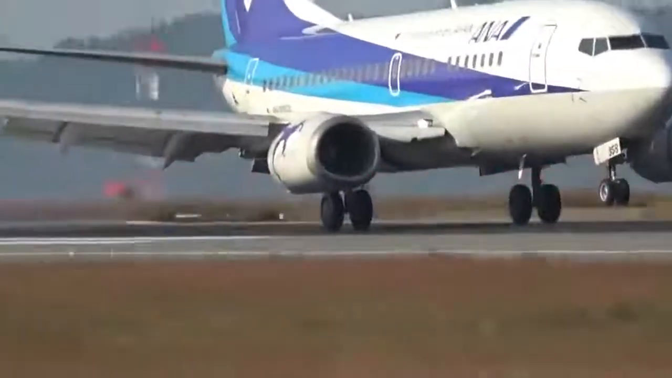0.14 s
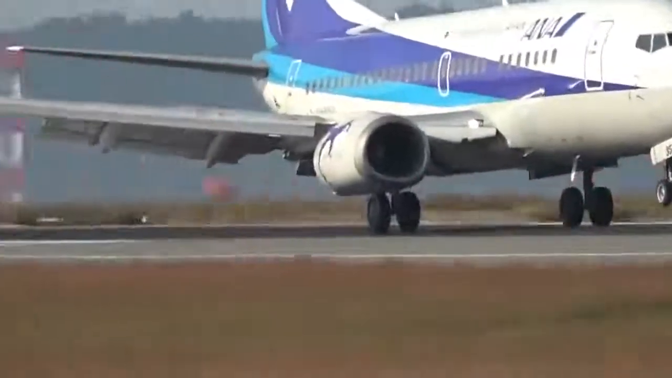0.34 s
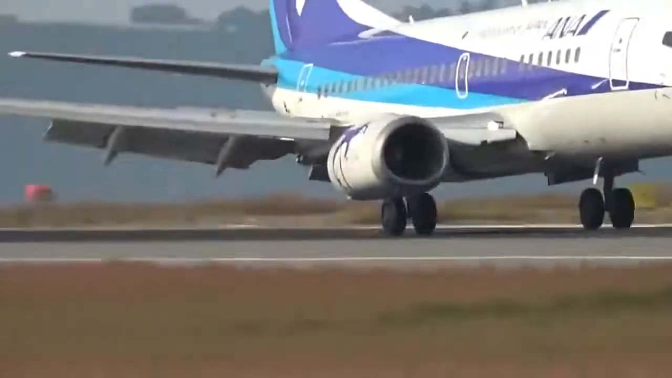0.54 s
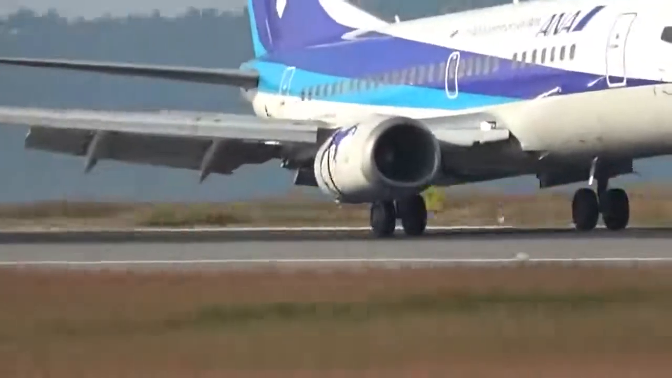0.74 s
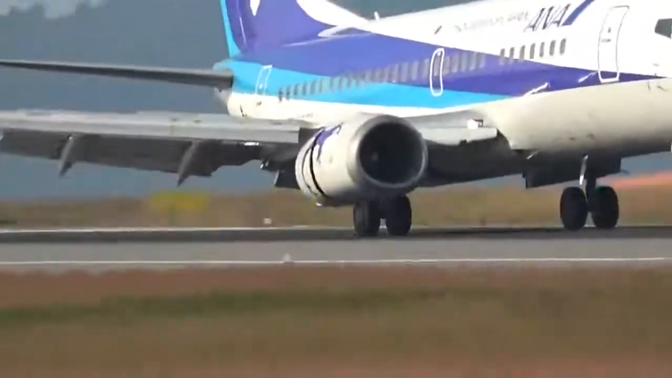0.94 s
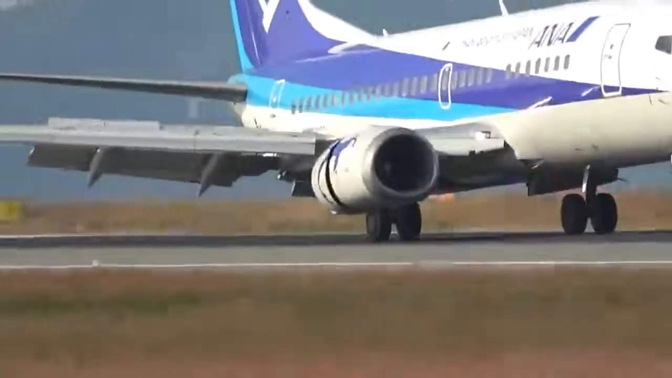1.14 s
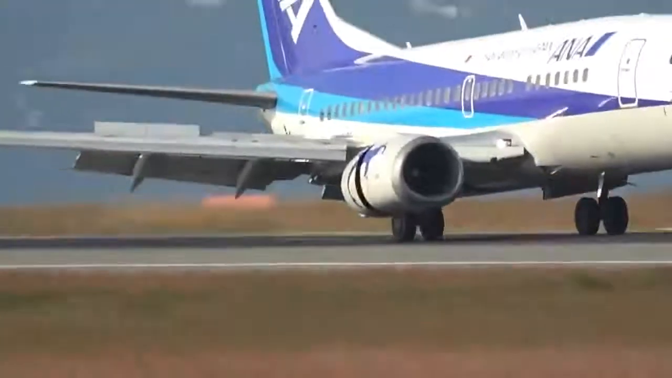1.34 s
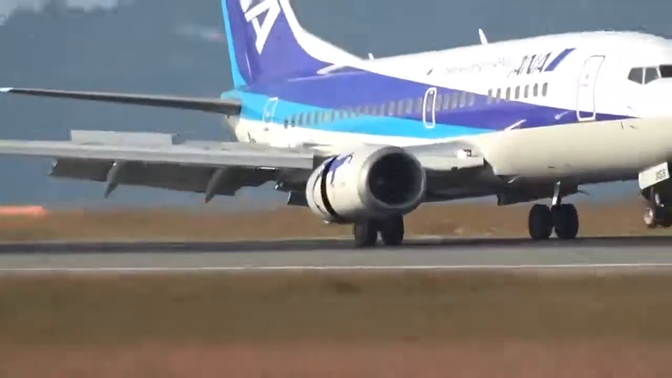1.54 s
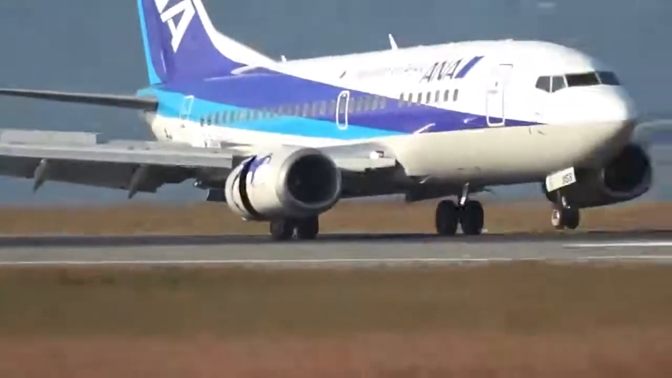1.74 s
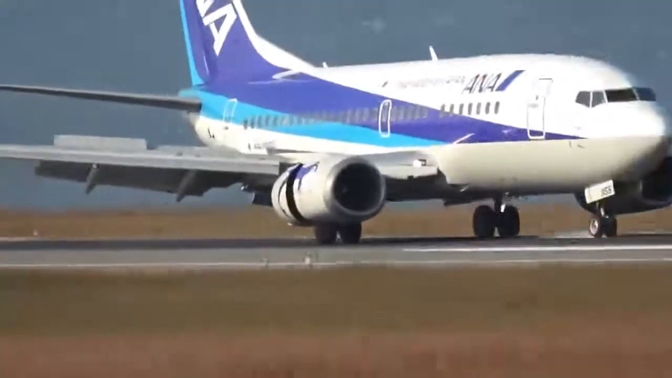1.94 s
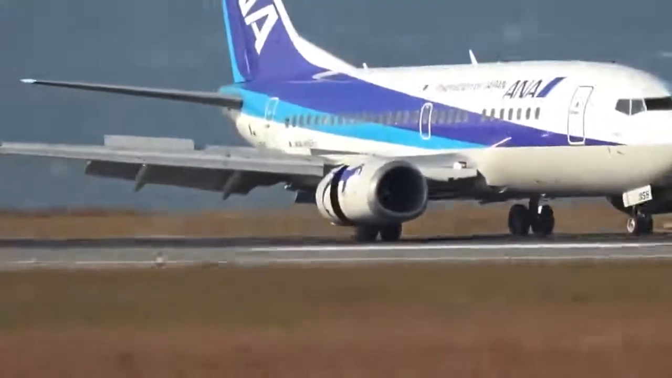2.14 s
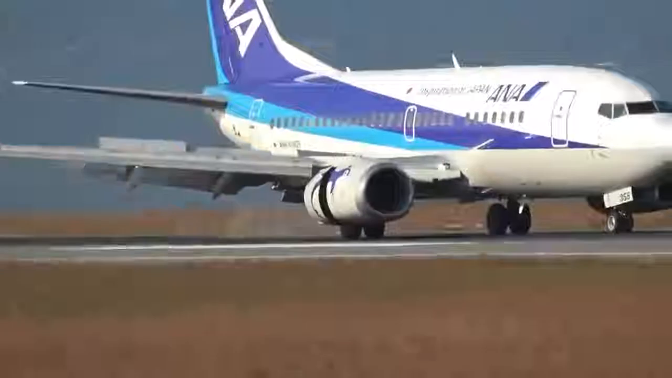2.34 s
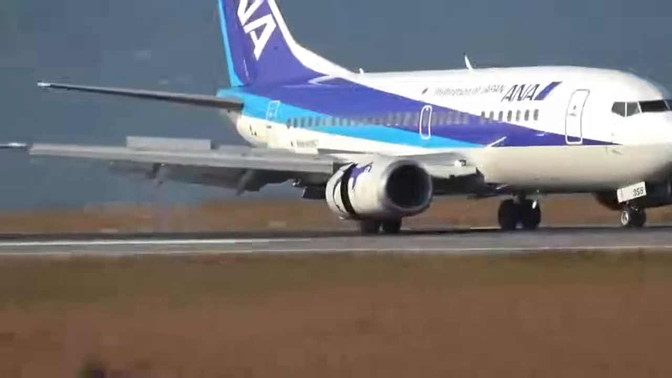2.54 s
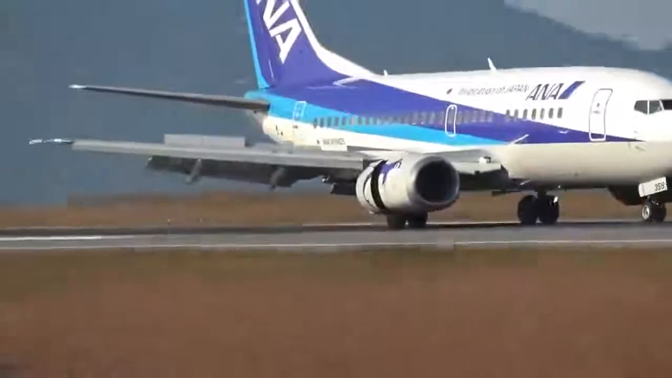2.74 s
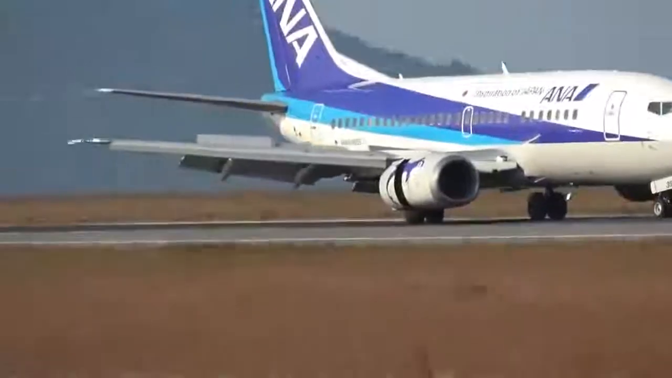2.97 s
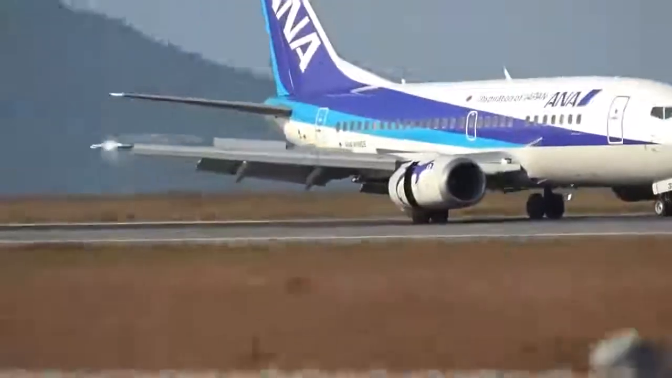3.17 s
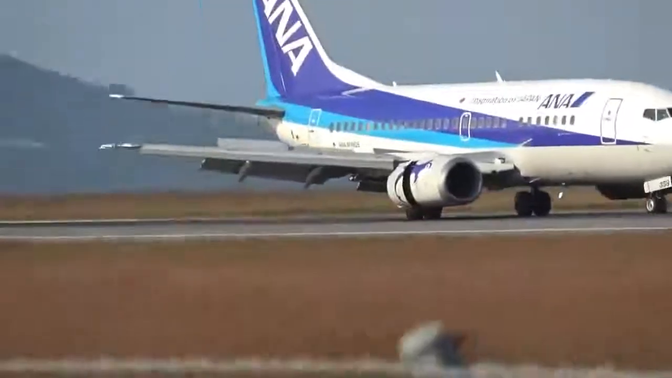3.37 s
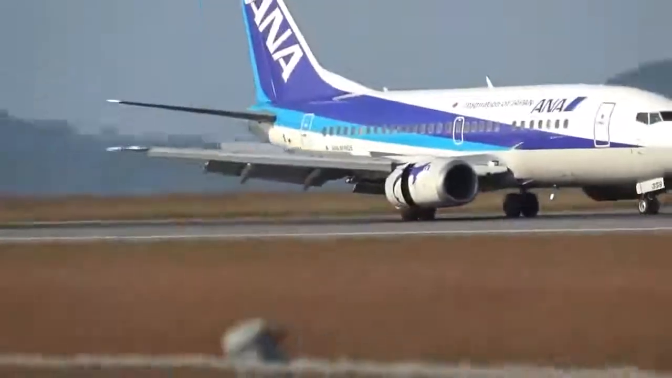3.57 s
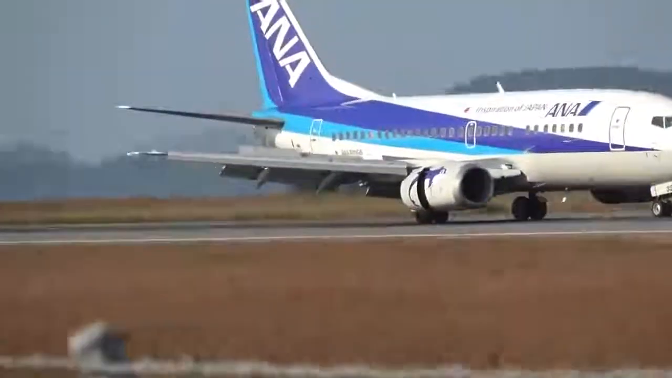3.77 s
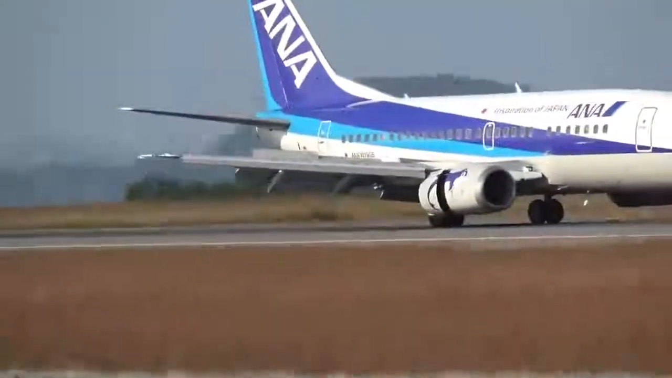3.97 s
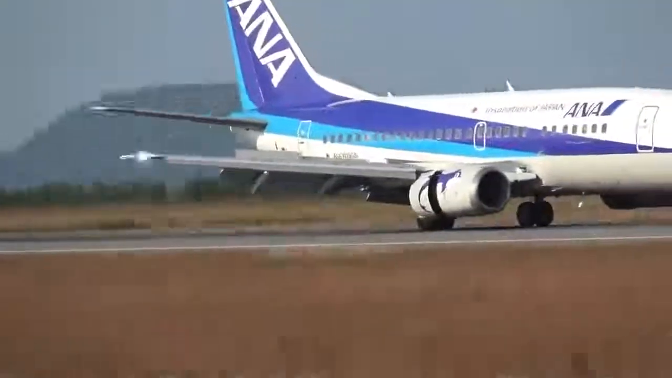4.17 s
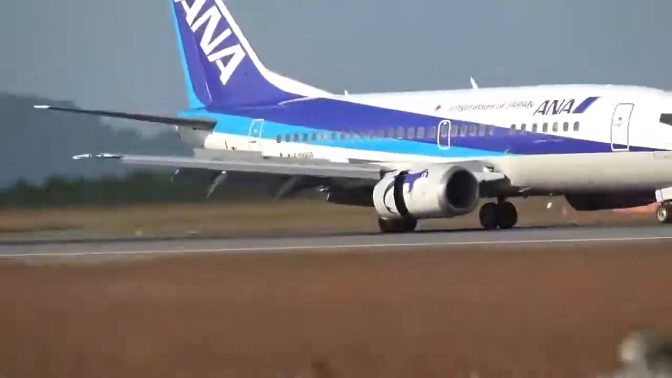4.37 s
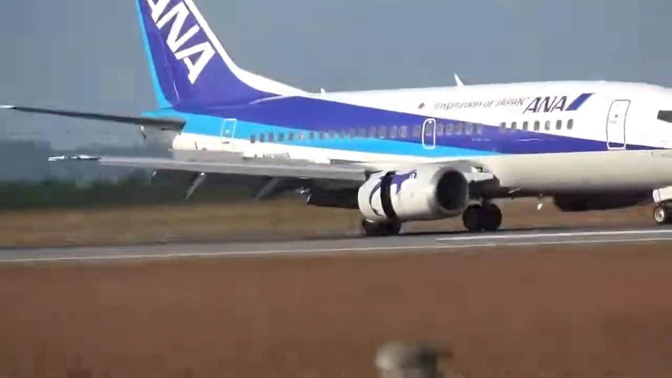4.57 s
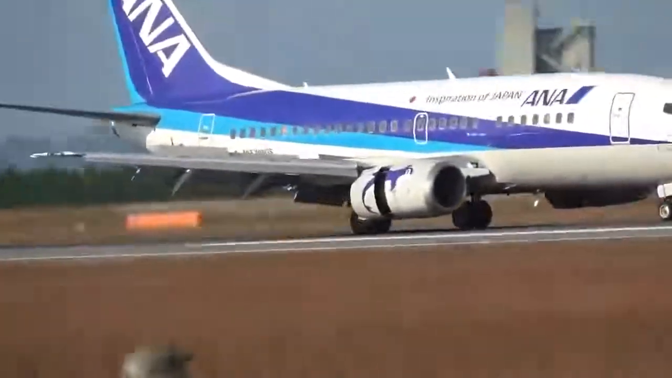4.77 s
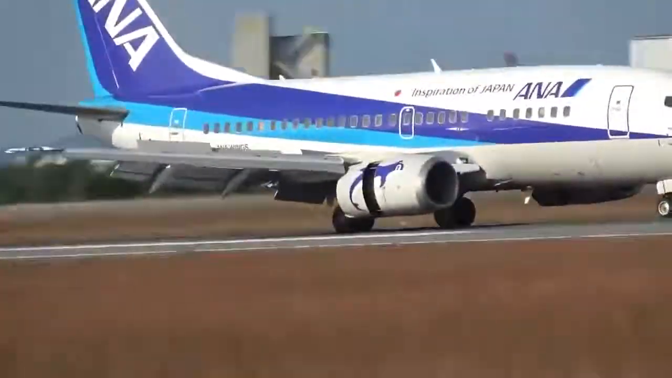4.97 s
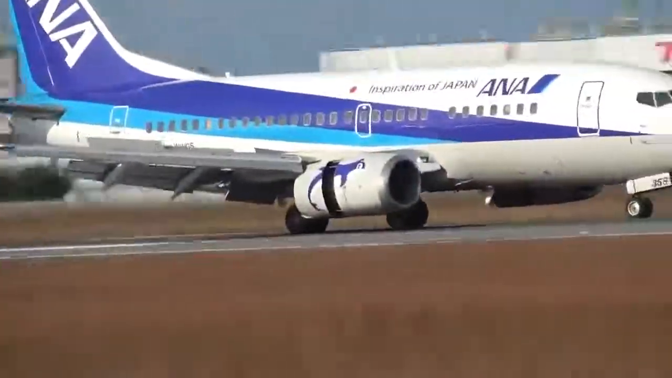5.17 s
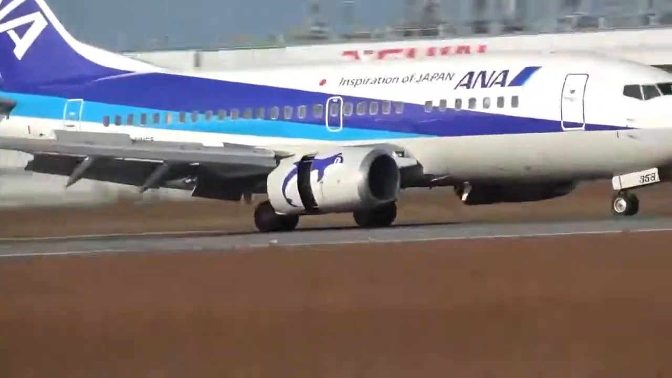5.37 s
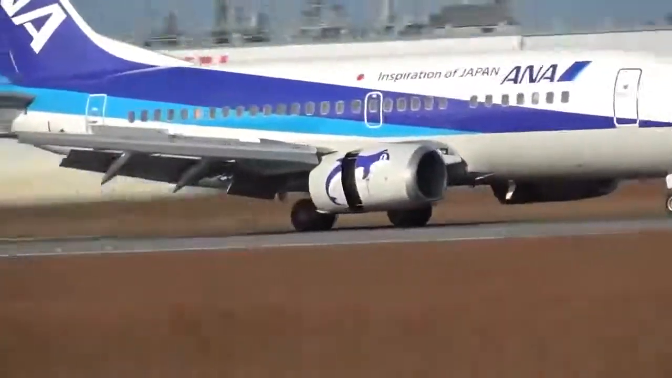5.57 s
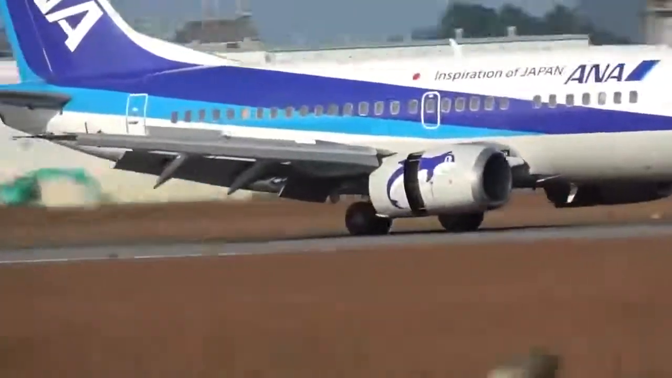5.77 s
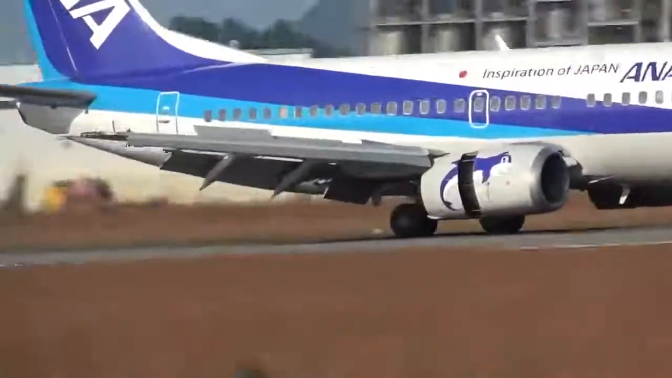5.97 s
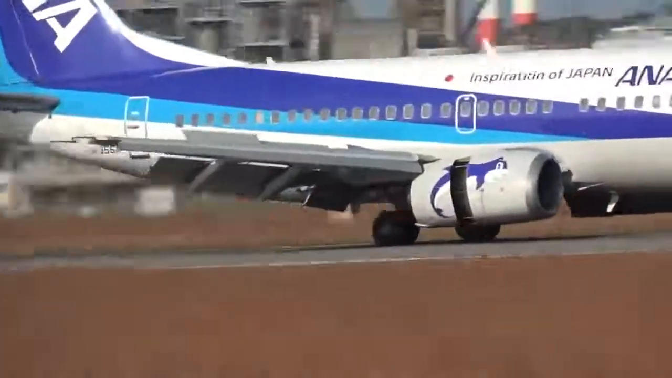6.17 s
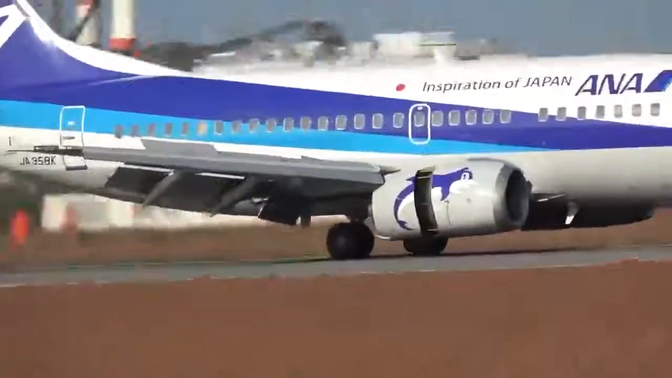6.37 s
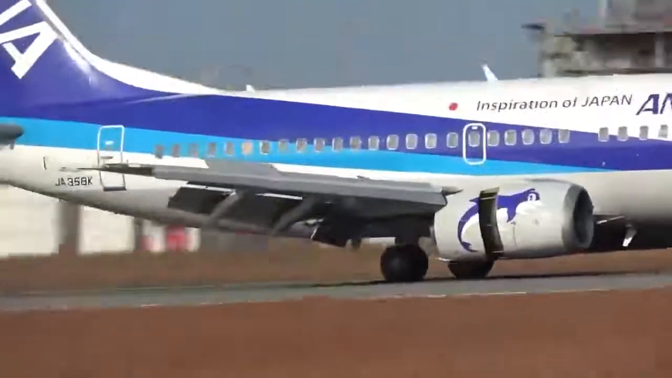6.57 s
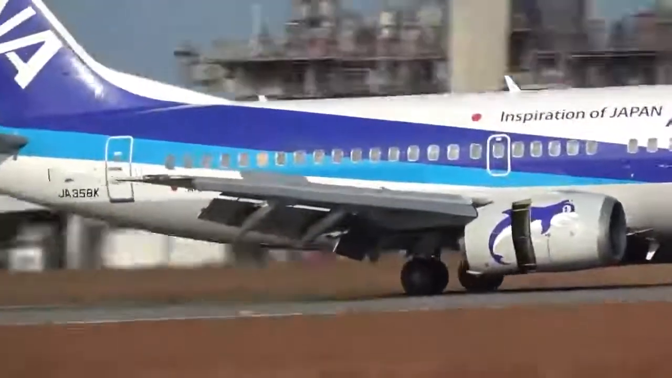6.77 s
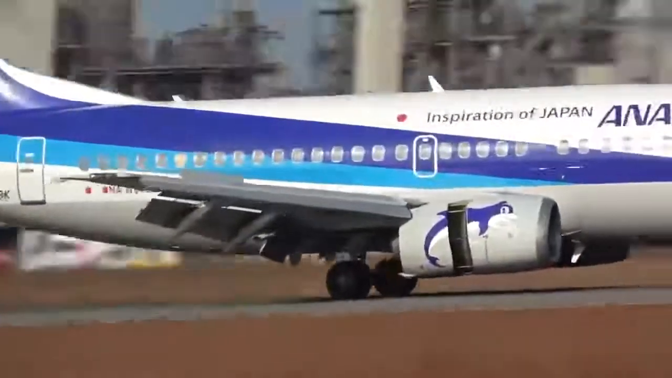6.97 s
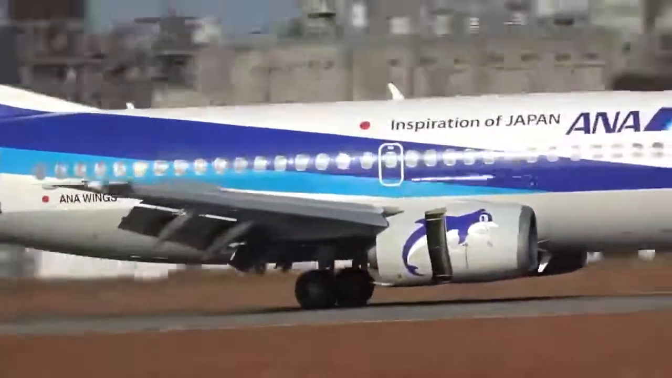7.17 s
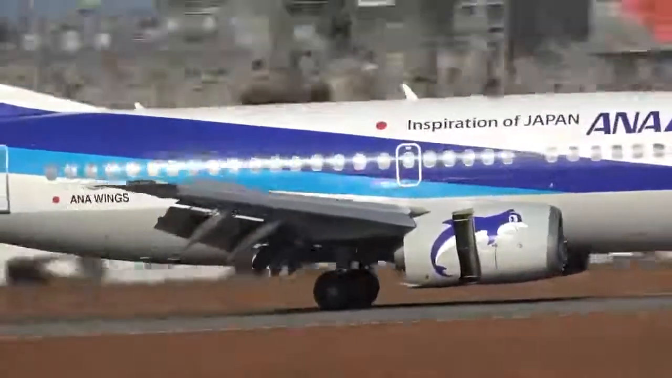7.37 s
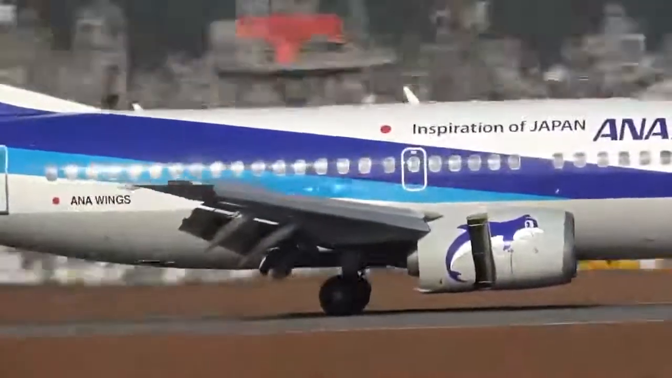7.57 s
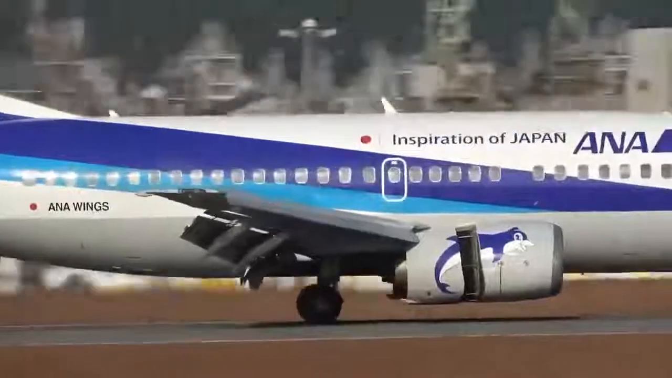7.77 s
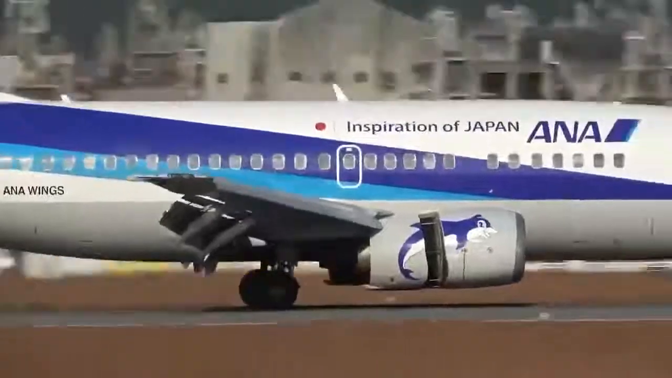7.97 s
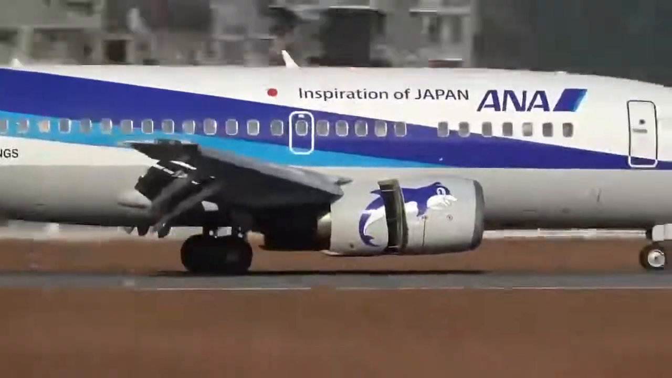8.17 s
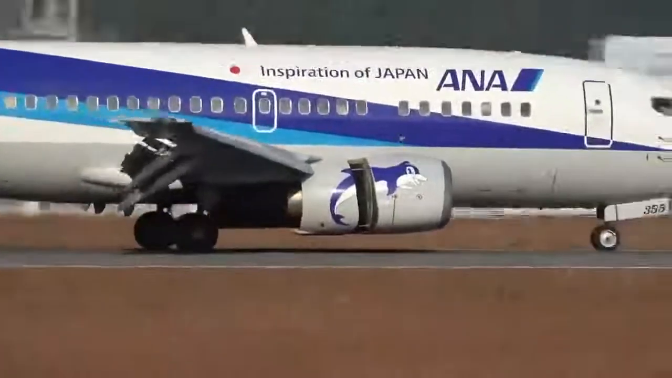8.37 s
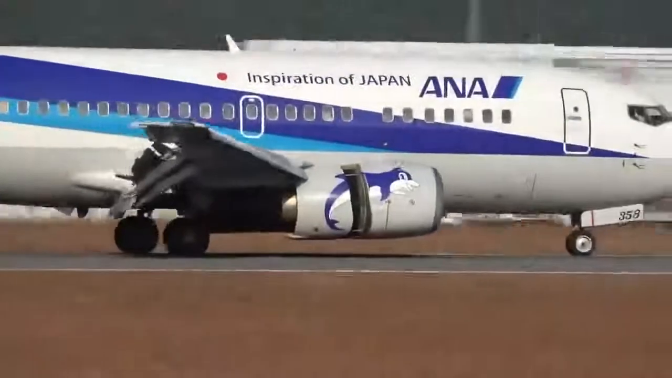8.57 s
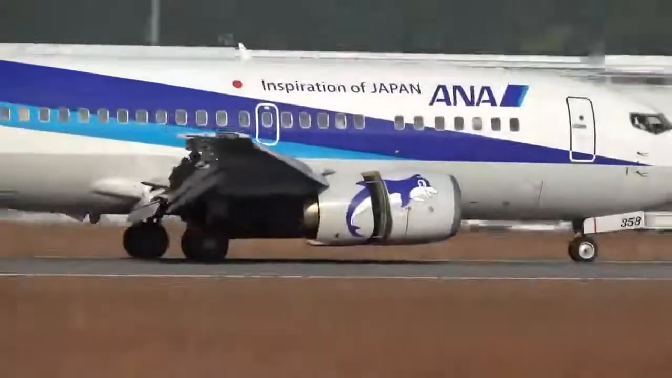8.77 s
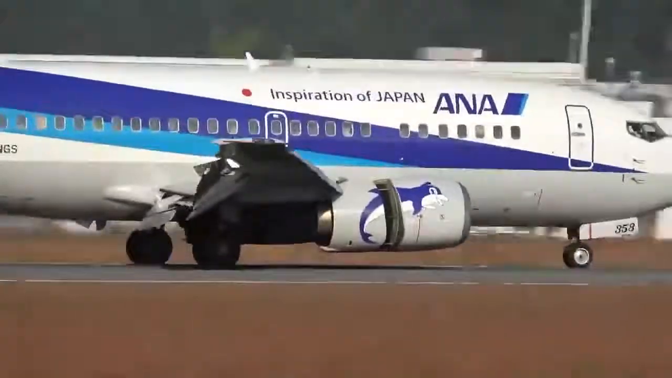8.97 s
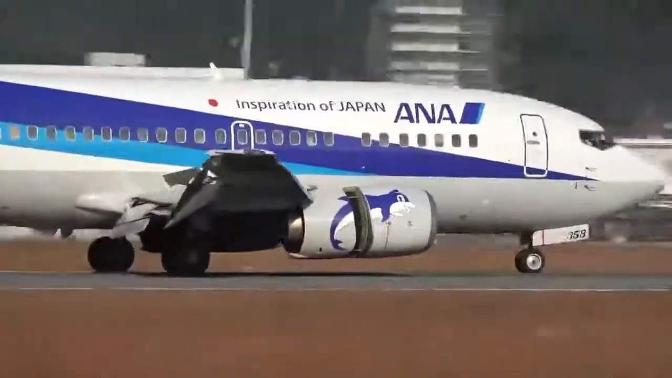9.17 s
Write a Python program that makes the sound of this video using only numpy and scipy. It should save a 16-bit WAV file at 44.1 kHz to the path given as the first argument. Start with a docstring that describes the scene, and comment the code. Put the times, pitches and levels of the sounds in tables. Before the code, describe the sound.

Distant jet engines hum in a light breeze, then build to a loud rushing roar as the landing airliner brakes and draws near.

```python
"""Beside a runway, far from a landing twin-jet airliner. A breeze bumps the microphone over the wash
of the open field, a low exhaust rumble and the hum of idling engines. From about 2 s the thrust
reversers open: the rumble builds, and the reversed fan air roars and hisses, brighter as it nears.
Around 4-5 s a whine sinks through it while compressor whistles climb. Moving air keeps carrying
the hiss over in short swells, and the roar holds until a short fade at the end."""
import sys
import numpy as np
from scipy import signal
from scipy.fft import rfft, irfft, next_fast_len
from scipy.io import wavfile
from scipy.ndimage import uniform_filter1d, minimum_filter1d, map_coordinates

SR = 44100
rng = np.random.default_rng(int(sys.argv[2]) if len(sys.argv) > 2 else 0)


def log_audio(samples):
    """Write samples as a 16-bit WAV file to the path given in sys.argv[1]."""
    # one column per channel
    frames = np.atleast_2d(samples).T
    # limit to full scale, then quantise
    limited = np.clip(frames, -1, 1)
    pcm = np.round(limited * 32767).astype(np.int16)
    wavfile.write(sys.argv[1], SR, pcm)


N = 406602
TIME = np.arange(N) / SR

# level of the reversers' roar and rush, with a short fade-out at the end: t/s, roar/dB, rush/dB
REVERSER_LEVELS = [(0.0, -45.5, -44.5), (0.43, -47, -44.5), (1.38, -43, -39), (2.02, -32.5, -34.5),
                   (2.87, -38, -36), (3.3, -26.5, -26), (3.64, -25, -24), (3.84, -19, -18),
                   (4.07, -19.5, -20.5), (4.43, -16.5, -21.5), (4.92, -23, -22.5), (5.25, -17.5, -17),
                   (6.07, -12.5, -18.5), (6.74, -15, -18), (7.25, -14.5, -19.5), (8.99, -14, -20.5),
                   (9.1, -13, -22), (9.2, -19.5, -23.5)]
# stereo width of the aircraft at the microphone: f/Hz, side minus mid/dB
AIRCRAFT_WIDTH = [(60, -19.5), (120, -24), (300, -30), (650, -36), (1300, -21), (2000, -22.5), (3700, -19),
                  (4600, -11), (6000, -22.5), (7500, -16.5), (8800, -6), (10500, -26.5)]


def amp(db):
    """Decibels to gain."""
    return 10 ** (np.asarray(db) / 20)


def unit(x):
    """Scale to rms 1."""
    return x / np.sqrt(np.mean(x ** 2) + 1e-20)


def along(points, hz):
    """(f/Hz, value) points read on a log axis."""
    freqs, values = np.transpose(points)
    return np.interp(np.log(hz + 1), np.log(freqs + 1), values)


def curves(rows, t=TIME):
    """Each column after the time, read at times t."""
    times, *columns = np.transpose(rows)
    return [np.interp(t, times, column) for column in columns]


def wobble(rate):
    """A smooth random curve, rate knots a second."""
    return map_coordinates(rng.standard_normal(int(N * rate / SR) + 4), [TIME * rate])


def bell(hz, centre, octaves):
    """A hump of height 1 on a log-frequency axis."""
    return np.exp(-.5 * (np.log2((hz + 1) / centre) / octaves) ** 2)


def hump(s, half_s):
    """A smooth rise and fall of height 1 around time s."""
    return np.exp(-.5 * ((TIME - s) / half_s) ** 2)


def lift(rows):
    """Sum of (t/s, lift/dB, half-length/s) humps, in dB."""
    return sum(db * hump(s, half_s) for s, db, half_s in rows)


def turbulence(colour, width, patchy_db, size=1024):
    """Stereo noise of steady rms 1, its spectrum shaped by colour(hz, t) in dB, with drifting patches."""
    frames = dict(nperseg=size, noverlap=size * 3 // 4)
    hz, t, spectra = signal.stft(rng.standard_normal((2, N)), SR, **frames)
    hz = hz[:, None]
    patches = uniform_filter1d(rng.standard_normal(spectra.shape[1:]), size=7, axis=0)
    patches = unit(uniform_filter1d(patches, size=18, axis=1))
    gain = amp(colour(hz, t) + patchy_db * patches)
    spectra = spectra * gain / np.linalg.norm(gain, axis=0)
    spectra[1] *= amp(along(width, hz))
    mid, side = signal.istft(spectra, **frames)[1][:, :N]
    return unit(np.array([mid + side, mid - side]))


def airfield(level_db=-47, hiss_db=-62):
    """The wide, faint wash of the open field, and the microphone's own hiss."""
    # spectrum of the open field: f/Hz, relative level/dB
    spectrum = [(30, -4.5), (150, -16.5), (260, -8), (800, -7.5), (1500, -23), (2500, -20.5), (5000, -41),
                (8000, -64)]
    wash = turbulence(lambda hz, t: along(spectrum, hz), width=[(30, -5.0)], patchy_db=1.5)
    return amp(level_db) * wash + amp(hiss_db) * rng.standard_normal((2, N))


def wind(lumps_db=1.7):
    """The breeze buffets the two microphone ports unevenly; each gust is a short low thump."""
    # breeze on the microphone: t/s, level/dB
    breeze = [(0, -38), (1.6, -43.5), (2.6, -38), (3.1, -37), (4.2, -36), (6.5, -42), (9.2, -45)]
    # single gusts: t/s, peak level/dB, strongest f/Hz, half-length/s, left minus right/dB
    gusts = [(.2, -26, 50, 0.027, -1), (0.57, -36, 40, 0.052, -8), (0.77, -29, 32, .03, 7),
             (3.72, -32, 38, .08, -1), (4.09, -21, 34, 0.02, -2)]
    # spectrum of the buffeting: f/Hz, relative level/dB
    spectrum = [(10, -12), (40, 2), (70, -5), (130, -27), (400, -49), (2000, -110)]
    peak_hz = spectrum[1][0]
    width = [(30, -2.5)]  # f/Hz, side minus mid/dB
    buffet = turbulence(lambda hz, t: along(spectrum, hz), width, patchy_db=3, size=4096)
    air = amp(curves(breeze)[0] + lumps_db * wobble(7)) * buffet
    for s, db, gust_hz, half_s, pan_db in gusts:
        eddy = turbulence(lambda hz, t: along(spectrum, hz * peak_hz / gust_hz), width,
                          patchy_db=1, size=4096)
        port_db = db + np.array([[pan_db], [-pan_db]]) / 2
        air += amp(port_db) * hump(s, half_s) * eddy
    return air * amp([[-1.5], [1.5]])  # all of it leans 3 dB to the right


def ground_dip(hz, t, octaves=0.33):
    """Direct sound and its reflection off the ground cancel in one band at the microphone; gain in dB."""
    # dip cut by the reflection: t/s, centre f/Hz, depth/dB
    dip = [(0, 278, 6.5), (1.4, 350, -1), (2.6, 330, 3.5), (3.6, 268, 4), (4.1, 256, 11.5), (5.4, 253, 11),
           (6.4, 299, 4.5), (7.3, 327, 4), (9.2, 335, 7.5)]
    centre, depth_db = curves(dip, t)
    return -depth_db * bell(hz, centre, octaves)


def exhaust(churn_db=.5, surge_half_s=0.072):
    """Large eddies in the exhaust rumble below the ground dip, and surge now and then."""
    # rumble building with the thrust: t/s, level/dB
    levels = [(0, -41), (1.3, -40.5), (2.2, -34), (3.0, -26.5), (3.7, -22.5), (4.7, -25.5), (5.5, -24),
              (7.2, -18.5), (7.9, -21.5), (9.2, -23)]
    # spectrum of the rumble: f/Hz, relative level/dB
    spectrum = [(20, -26), (45, -8.5), (70, -1.5), (110, 4), (155, 2), (195, -4.5), (235, -15.5),
                (320, -12), (500, -65)]
    # drift that shifts this spectrum by its ratio to its own mean: t/s, f/Hz
    drift = [(0, 126), (3.3, 123), (4.2, 116), (7, 107.7), (8.6, 141.6)]
    # surges of the rumble: t/s, lift/dB
    surges = [(3.41, 1.5), (5.0, 3.5), (5.85, 2.5), (6.87, 3.5), (7.46, 4), (8.6, 4)]

    def colour(hz, t):
        centre, = curves(drift, t)
        return along(spectrum, hz * np.mean(centre) / centre) + ground_dip(hz, t)
    surge_db = sum(db * hump(s, surge_half_s) for s, db in surges)
    level_db = curves(levels)[0] + surge_db + churn_db * wobble(8.9)
    return amp(level_db) * turbulence(colour, AIRCRAFT_WIDTH, patchy_db=0, size=4096)


def blade_tone(rows, blur_hz, direct, flicker_db):
    """A blade tone from afar: a direct share of its power, the rest scattered by the turbulent air."""
    hz, db = curves(rows)
    carrier = np.exp(2j * np.pi * np.cumsum(hz) / SR)
    scatter = wobble(blur_hz) + 1j * wobble(blur_hz)
    air_path = np.sqrt(direct) + np.sqrt((1 - direct) / 2) * scatter
    sounding = (TIME >= rows[0][0]) & (TIME <= rows[-1][0])
    gate = uniform_filter1d(sounding.astype(float), size=4096)
    flicker = amp(flicker_db * wobble(12))
    return amp(db) * gate * unit(np.real(carrier * air_path) * flicker)


def blades():
    """The idle hum fades; the whine sinks and flares as the jet brakes; whistles climb with the spools."""
    # hum of the idling engines: t/s, f/Hz, level/dB
    idle_track = [(0, 664, -51.5), (.8, 659, -52), (1.6, 658, -68)]
    # falling engine whine: t/s, f/Hz, level between flares/dB
    whine_track = [(0, 2524, -59), (1.6, 2540, -51), (3.4, 2340, -41), (4.3, 2200, -31.5), (4.6, 2110, -32),
                   (5.6, 1974, -34), (6.1, 1860, -42), (6.7, 1750, -56)]
    # flares of the whine: t/s, lift/dB, half-length/s
    flares = [(2.9, 3, 0.18), (3.87, 9.5, .08), (4.29, 10, .09), (5.6, 4, 0.1)]
    # upper compressor whistle: t/s, f/Hz, level/dB
    high_track = [(3.3, 4330, -62), (3.65, 4460, -55), (4.4, 4950, -56), (4.8, 5320, -53), (5.2, 5800, -67)]
    # lower compressor whistle: t/s, f/Hz, level/dB
    low_track = [(3.4, 2900, -60), (3.8, 3280, -34.5), (4.25, 3960, -57), (4.47, 4180, -34.5),
                 (4.6, 4290, -45), (4.76, 4490, -42), (4.95, 4690, -54), (5.22, 5170, -44),
                 (5.45, 5440, -51)]
    hum = blade_tone(idle_track, blur_hz=22, direct=0.81, flicker_db=1)
    whine = amp(lift(flares)) * blade_tone(whine_track, blur_hz=170, direct=.04, flicker_db=2)
    high_whistle = blade_tone(high_track, blur_hz=161.5, direct=.05, flicker_db=0)
    low_whistle = blade_tone(low_track, blur_hz=78.7, direct=0.42, flicker_db=1.5)
    return hum + whine + high_whistle + low_whistle


def reverser_roar(trim_db=0.25, howl_octaves=0.34):
    """The reversed fan air roars, with a hollow howl that moves with the angle to the aircraft."""
    # spectrum of the roar: f/Hz, relative level/dB
    spectrum = [(150, -25.5), (240, -6.5), (370, -4), (490, -0.5), (650, -1.5), (1000, -2), (1250, -9),
                (1800, -20.5), (3000, -77.5)]
    # broad resonance in the roar: t/s, centre f/Hz, height/dB
    howl = [(0, 706, 5.5), (1.5, 890, 0), (2.1, 954, 5), (2.7, 900, 0.5), (3.4, 956, -0.5),
            (4.3, 1040, 10.5), (4.9, 930, 4.5), (5.6, 796, 8.5), (6.45, 857, 6.5), (6.7, 687, 5.5),
            (7.4, 726, 7), (8.3, 853, 8), (9.2, 885, 8.5)]

    def colour(hz, t):
        centre, height_db = curves(howl, t)
        return along(spectrum, hz) + height_db * bell(hz, centre, howl_octaves) + ground_dip(hz, t)
    level_db = curves(REVERSER_LEVELS)[0] + trim_db
    return amp(level_db) * turbulence(colour, AIRCRAFT_WIDTH, patchy_db=2.43, size=2048)


def reverser_vanes(hiss_trim_db=2.54, rush_swell_share=0.29, flutter_db=0.83, rasp_db=0.77):
    """Small eddies at the reverser vanes rush and hiss; the air dulls the hiss while the jet is far."""
    # spectrum of the rush: f/Hz, relative level/dB
    rush_spectrum = [(500, -15), (900, -7.5), (1220, 1), (1600, 0.5), (2150, -1), (2600, -6.5),
                     (3100, -15.5), (4200, -40), (7000, -70)]
    # spectrum of the hiss: f/Hz, relative level/dB
    hiss_spectrum = [(1500, -25), (2400, 0), (3000, 0.5), (3700, -3), (4400, -6.5), (5100, -7), (6500, -12),
                     (7800, -19), (8800, -29), (9700, -36.5), (11000, -45)]
    # hiss between swells: t/s, level before trim/dB
    hiss_levels = [(0, -53), (.5, -50.5), (1.5, -41.5), (2.05, -44.5), (3.0, -43.5), (3.5, -34.5),
                   (4.15, -38), (4.8, -36.5), (5.25, -32.5), (6.4, -30.5), (7.05, -31.5), (8.0, -28.5),
                   (9.2, -33.5)]
    # dulling by the air, easing as the distance closes: t/s, gain near 5 kHz against 3.6 kHz/dB
    dulling = [(0, -7), (1.4, -9), (3.0, -4.5), (5.6, -.5), (9.2, 0.56)]
    # moving air carries the treble over to the microphone: t/s, lift/dB, half-length/s
    swells = [(1.01, 4.5, 0.04), (1.31, 3.5, 0.054), (1.65, 3.5, 0.043), (2.45, 5, 0.056),
              (2.9, 3.5, 0.045), (3.27, 2.5, .06), (3.88, 4, 0.066), (4.39, 7.5, 0.1), (5.04, 3, 0.055),
              (5.57, 2.5, 0.086), (5.89, 3.5, 0.096), (6.32, 5, 0.046), (6.65, 5.5, 0.078),
              (7.27, 4, 0.073), (7.63, 5, 0.04), (7.95, 3, .06), (8.4, 4.5, 0.06), (8.82, 5.5, 0.11)]

    def hiss_colour(hz, t):
        absorption = np.maximum((hz / 3600) ** 2 - 1, -.5)  # grows faster than frequency
        return along(hiss_spectrum, hz) + curves(dulling, t)[0] * absorption
    swell_db = lift(swells)
    hiss_db = curves(hiss_levels)[0] + hiss_trim_db + swell_db
    rush_db = curves(REVERSER_LEVELS)[1] + rush_swell_share * swell_db
    hiss = amp(hiss_db) * turbulence(hiss_colour, AIRCRAFT_WIDTH, patchy_db=1.6)
    rush = amp(rush_db) * turbulence(lambda hz, t: along(rush_spectrum, hz), AIRCRAFT_WIDTH, patchy_db=1.73)
    # moving air flutters the treble, and steep wave fronts roughen it
    return (rush + hiss) * amp(flutter_db * wobble(22) + rasp_db * wobble(350))


def scene():
    """Field and wind, with the aircraft held in the centre of the stereo image."""
    return airfield() + wind() + exhaust() + blades() + reverser_roar() + reverser_vanes()


def record(dry, ceiling=.98, fade_s=.005, top_hz=11080):
    """A limiter behind the microphone ducks the highest peaks; the ends are soft, the top is cut off."""
    needed_gain = np.minimum(1, ceiling / (np.abs(dry).max(axis=0) + 1e-9))
    limited = dry * uniform_filter1d(minimum_filter1d(needed_gain, size=257), size=255)
    fades = np.minimum(1, np.minimum(TIME, TIME[::-1]) / fade_s)
    padded = next_fast_len(N + SR // 2)
    passband = np.fft.rfftfreq(padded, 1 / SR) < top_hz
    return irfft(rfft(limited * fades, padded) * passband, padded)[:, :N]


dry = scene()
out = record(dry)
log_audio(out)
```